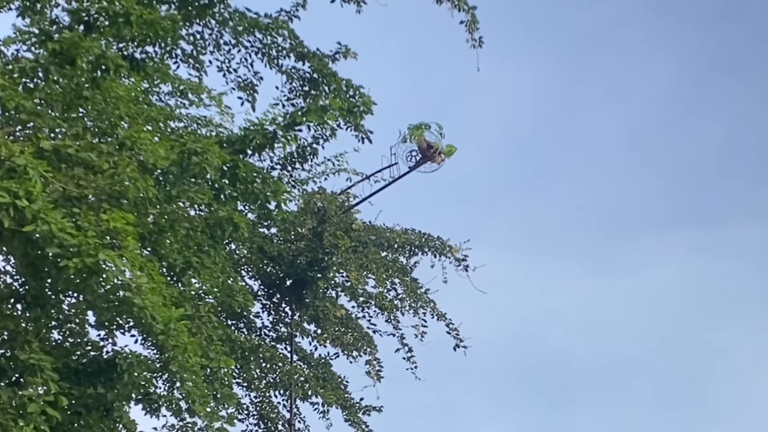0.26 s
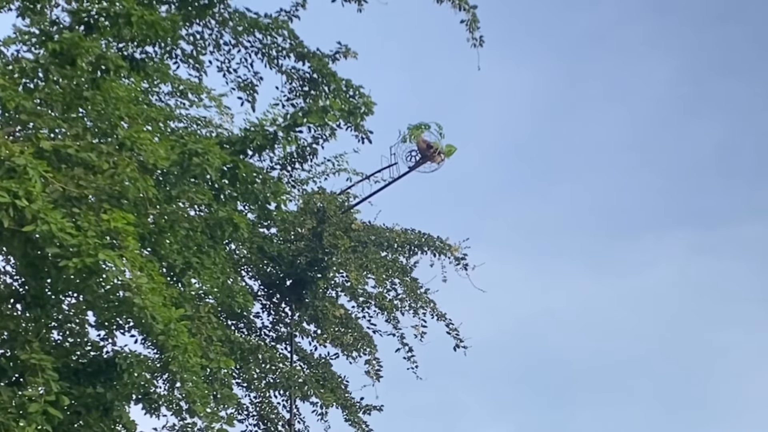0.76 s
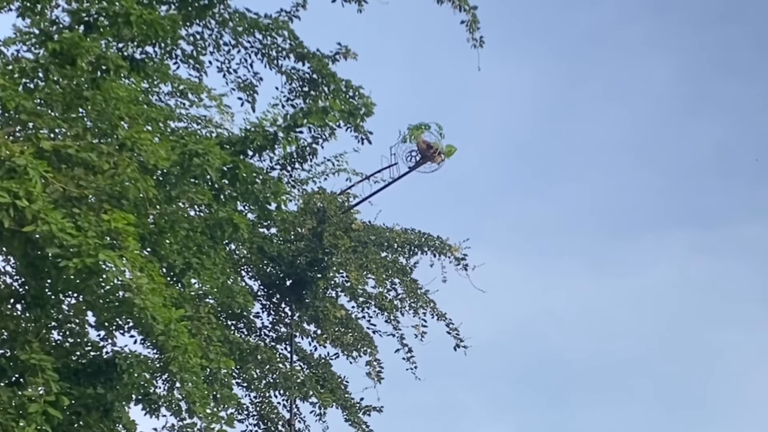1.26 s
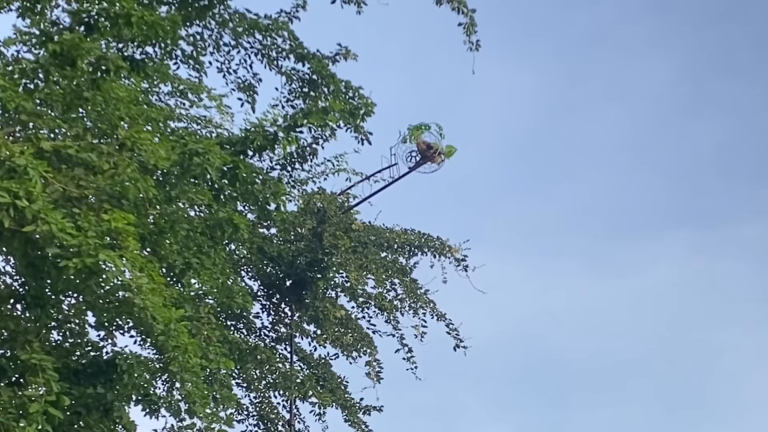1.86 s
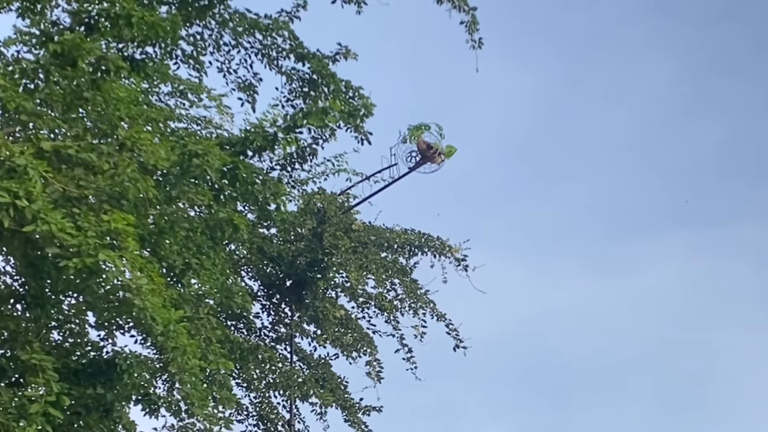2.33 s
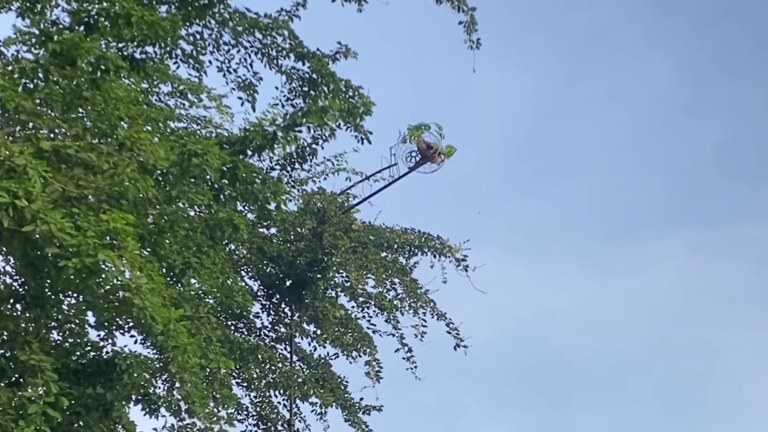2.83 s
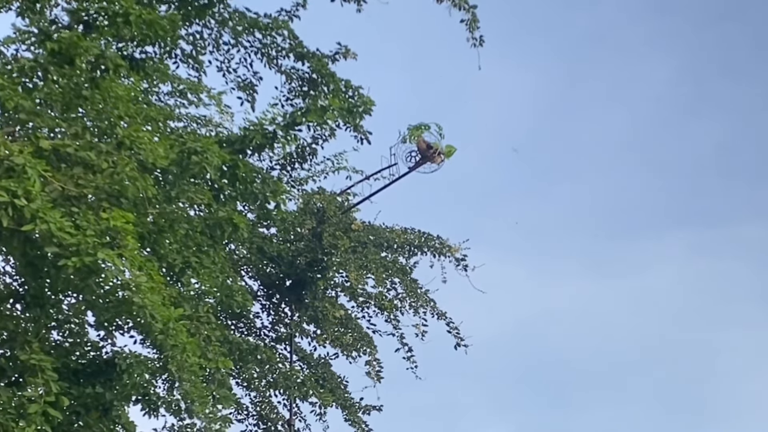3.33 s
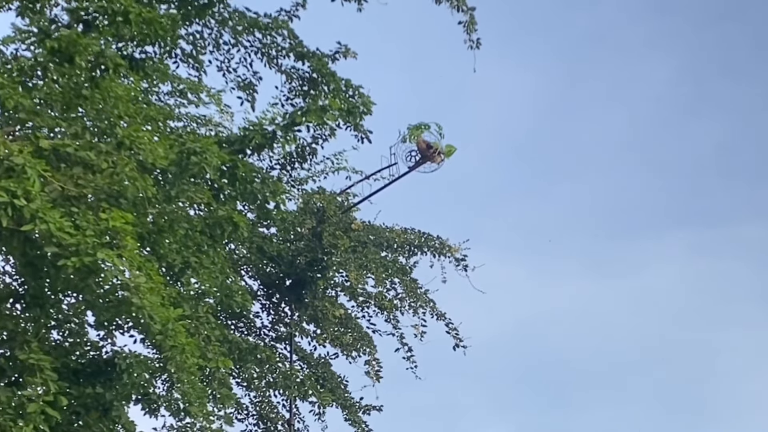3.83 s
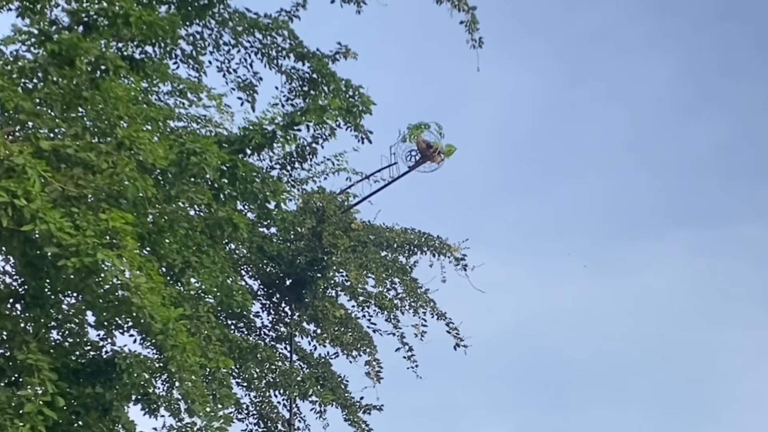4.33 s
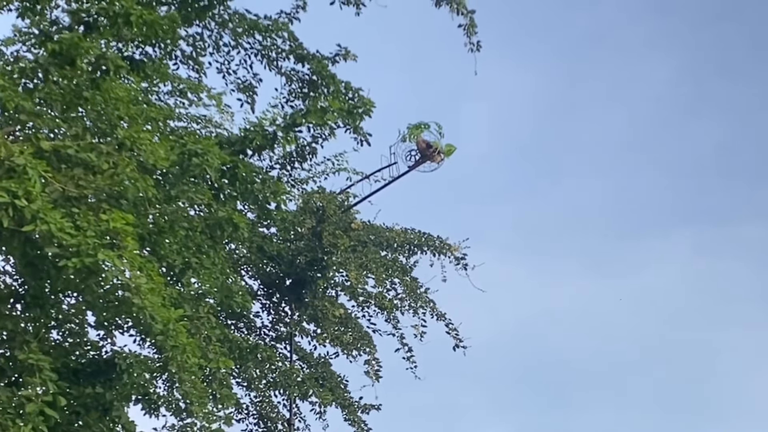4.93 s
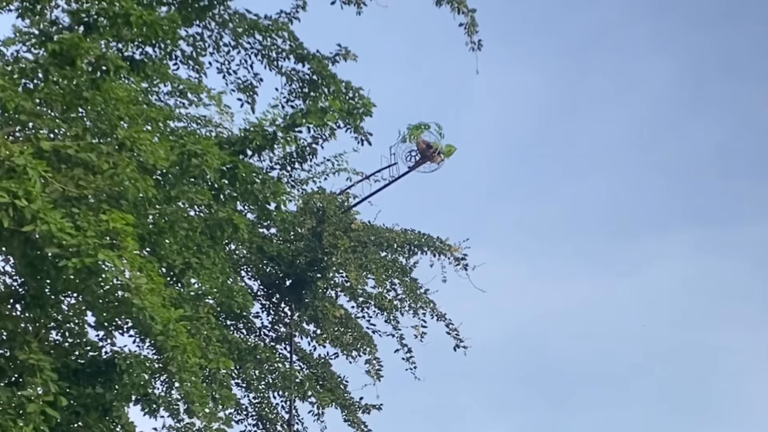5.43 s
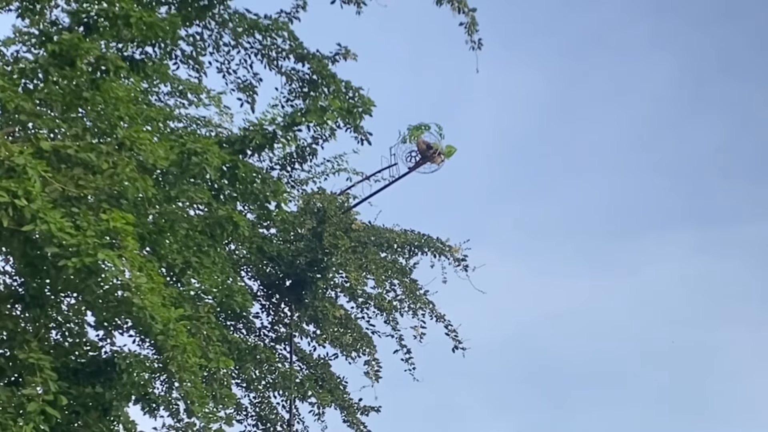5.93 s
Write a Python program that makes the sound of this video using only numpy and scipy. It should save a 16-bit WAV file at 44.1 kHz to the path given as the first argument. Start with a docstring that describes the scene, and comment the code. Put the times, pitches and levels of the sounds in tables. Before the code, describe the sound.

A low dove gives two four-note cooing phrases, each answered by a higher dove from the side, amid steady insect trills and distant rumble.

```python
"""A garden where two doves coo in turn from cages hung on poles: a near one in two low four-note phrases
with a rolled third note, a higher one answering twice from one side. Each coo is a nearly pure gliding
tone coloured by its path, with echoes from walls and trees. Faint high tones are small arched notes,
insects trills of falling whistles; small birds, distant traffic and open air are filtered noise, and
one engine is a drifting sine."""
import sys
import numpy as np
from scipy import signal
from scipy.fft import rfft, irfft, next_fast_len
from scipy.io import wavfile
from scipy.ndimage import uniform_filter1d, map_coordinates

SR = 44100
rng = np.random.default_rng(int(sys.argv[2]) if len(sys.argv) > 2 else 0)


def bounce(signal):
    """Save signal as a 16-bit WAV file at the path given by the first command-line argument."""
    frames = np.transpose(np.atleast_2d(signal))
    limited = np.clip(frames, -1, 1)
    pcm = np.round(limited * 32767).astype(np.int16)
    wavfile.write(sys.argv[1], SR, pcm)


N = 272979  # length in samples

# Level of the traffic rumble. Each row: time in seconds, level in dB.
TRAFFIC = [(0.0, -23), (0.14, -31), (0.58, -25.5), (1.21, -31), (1.26, -27), (2.481, -28.5), (2.53, -24.5),
           (2.57, -29.5), (4.57, -28), (5.57, -30.5), (5.77, -29), (6.19, -29)]
# Spectrum of the rumble. Each row: frequency in Hz, relative density in dB per Hz.
RUMBLE = [(12, -39), (20, -26), (43, 3.5), (65, 2), (112, -3.5), (160, -5.5), (219, -12), (420, -20),
          (550, -49), (920, -120)]
# Spectrum of the open air. Each row: frequency in Hz, relative density in dB per Hz.
AIR = [(150, -19), (300, -1), (450, -2.5), (700, -5.5), (1000, -9), (1300, -12.5), (1700, -22.5),
       (2400, -28.5), (3300, -34.5), (5400, -38), (5850, -31), (6350, -35), (6600, -38.5), (8300, -47.5),
       (12000, -47)]
# Likeness of left and right in the noise layers. Each row: frequency in Hz, correlation 0-1.
LEFT_RIGHT_LIKENESS = [(50, 1), (120, 0.98), (250, 0.91), (500, 0.8), (800, 0.15), (1300, 0), (2200, 0.086),
                       (3000, 1), (3800, 0.99), (6300, 1), (8000, 0.1)]

# Level of the farther insects, before a small final lift. Each row: time in seconds, level in dB.
CHORUS = [(0, -55), (.45, -58), (.8, -58.5), (1.151, -62.5), (1.45, -61.5), (1.802, -56.5), (2.2, -52),
          (2.3, -67), (2.33, -65), (2.38, -56), (2.9, -53), (3.7, -56), (4.12, -56.5), (4.4, -53.5),
          (4.82, -57), (5.25, -56.5), (5.45, -52), (6.19, -54.5)]
# Resonance of their blurred rasp. Each row: frequency in Hz, gain in dB.
RASP = [(2180, -44.5), (3700, -13), (3970, -9), (4310, 0), (4530, 4), (5000, -4.5), (5210, -21.5),
        (5320, -18), (5600, -21), (7280, -48.5), (12300, -120)]
# Chirps of the nearer insects, each an even run of wing strokes. Each row: first stroke in seconds,
# last stroke in seconds, level in dB before colour, echoes and trim, middle pitch in Hz.
CHIRPS = [(.032, .199, -46, 4686), (0.272, .431, -47, 4730), (0.555, 0.67, -48.5, 4630),
          (0.821, 0.905, -48.5, 4500), (0.964, 1.043, -50, 4540), (1.238, 1.354, -52.5, 4515),
          (1.484, 1.598, -51, 4515), (1.63, 1.754, -47, 4795), (1.832, 1.913, -47, 4950),
          (1.926, 2.038, -49, 4570), (2.072, 2.246, -46, 4725), (2.356, 2.498, -47.5, 4660),
          (2.559, 2.706, -50.5, 4590), (2.662, 2.782, -49, 4940), (2.79, 2.871, -52.5, 4620),
          (2.9, 3.058, -47, 4750), (3.127, 3.264, -46.5, 4735), (3.316, 3.417, -50.5, 4410),
          (3.378, 3.51, -47.5, 4890), (3.549, 3.663, -50, 4560), (3.736, 3.896, -51, 4580),
          (3.981, 4.09, -47, 4550), (4.214, 4.288, -48, 4540), (4.367, 4.522, -49.5, 4635),
          (4.64, 4.763, -49, 4610), (4.905, 4.991, -46.5, 4690), (5.103, 5.215, -49.5, 4630),
          (5.381, 5.492, -53.5, 4550), (5.5, 5.571, -48.5, 4905), (5.648, 5.747, -48.5, 4565),
          (5.808, 5.892, -47.5, 4580), (5.903, 5.983, -48, 4730), (6.043, 6.156, -48.5, 4570)]
# Colour of a single wing stroke. Each row: frequency in Hz, gain in dB.
STROKE_COLOUR = [(3900, -9.5), (4150, 0), (4300, 0.5), (4440, 3), (4580, 1), (4740, 0), (4840, -1),
                 (5030, 1.5), (5250, -11)]
STROKE_PERIOD_S, STROKE_S, STROKE_FALL_HZ_PER_S = .0393, .029, 34000
CHIRP_SWELL_DB, CHIRP_SAG_HZ = 1.5, 115  # a chirp is loudest in its middle and sinks in pitch as it goes

# The near dove, two phrases of four notes. Each row: start in seconds, rise in seconds, hold in seconds,
# fall in seconds, top pitch in Hz, pitch after the hold in Hz, last pitch in Hz, lateness of the sag
# (an exponent), level in dB before the colour and the push.
LOW_COOS = [ (.629, .06, 0.014, 0.0037, 745, 739, 700, 0.82, -18),
            (.927, 0.027, 0.17, .027, 668.7, 627, 537, 5, -18),
            (1.316, .034, 0.35, 0.095, 664.7, 568.8, 349, 1.5, -16.5),
            (2.032, .039, .138, .02, 622, 585, 504, 4.2, -17),
            (3.674, 0.044, 0.021, .006, 725, 741, 700, 1, -17),
            (3.965, .027, .177, 0.024, 669.8, 620.6, 530, 4, -18.5),
            (4.349, .036, 0.33, .115, 661.5, 566.5, 353.4, 1.6, -17),
            (5.065, .038, 0.14, .026, 623, 587.7, 514, 3.8, -16.5)]
# The higher dove, two answers of four notes, with the same columns.
HIGH_COOS = [ (2.851, .052, .103, .018, 1188, 1124, 1010, 1.8, -22),
             (3.02, .035, 0.0033, .012, 1074, 1052, 963, 1.2, -22),
             (3.099, .034, .002, .008, 973, 978, 944, 1, -23),
             (3.204, .027, .045, .022, 1091, 1062, 982, 1.7, -23.5),
             (5.356, .05, 0.096, .021, 1184, 1122, 974, 2, -22.5),
             (5.535, .034, 0.0025, 0.011, 1073, 1035, 957, 1, -22),
             (5.617, .032, .003, 0.011, 1060, 1042, 970, 1.2, -22.5),
             (5.727, .028, .05, 0.017, 1114, 1065, 1020, 2, -23)]
# Colour of each dove's direct sound: reflections near the microphone strengthen some pitches and
# weaken others. Each row: pitch in Hz, gain in dB.
LOW_PATH = [(320, -19), (420, -21), (470, -13.5), (515, -8), (565, -1.1), (590, -2), (615, -7), (638, -18),
            (665, -9.5), (715, -22.5), (765, -23.5)]
HIGH_PATH = [(780, -19.5), (890, -14), (950, 1.5), (1020, -3.5), (1090, -10.5), (1190, -10)]
# The more even colour each bird spreads to the walls and trees. Each row: pitch in Hz, gain in dB.
LOW_SPREAD = [(400, -22.5), (520, -9), (570, 1), (615, -3.5), (670, -8), (760, -12)]
HIGH_SPREAD = [(850, -20.5), (950, 1.5), (1080, -3), (1200, -8.5)]
# A rising note lingers briefly near one pitch, then climbs on.
# Each row: share of the rise, pitch as a ratio to the lingering pitch.
LINGER = [(.37, 0.9803), (.63, 1.025)]
DROP_CURVE = 1.2  # as the air runs out the pitch slides down, ever faster
PUSH_DB, RELEASE_DB_PER_S = 2, 70  # a note grows louder toward its end, then fades as the pitch drops
# The rattle near the opening of each long note, faltering once. Each row: first beat in seconds,
# length in seconds, level in dB, weak beat in seconds, change of the weak beat in dB.
ROLLS = [(1.349, 0.13, -18.5, 1.432, -2), (4.3833, .086, -19.5, 4.404, -6.5)]
ROLL_PERIOD_S, ROLL_HZ = .0203, 595.5

# Decay of the diffuse scatter. Each row: frequency in Hz, time to fall 60 dB in seconds.
GARDEN_DECAY = [(300, 0.95), (1000, 1), (5000, .25), (10000, 0.14)]
# Wall echoes of each dove. Each row: delay in seconds, left gain in dB, right gain in dB.
LOW_ECHOES = [(.045, -18, -15.5), (.078, -30, -28)]
HIGH_ECHOES = [(.05, -28, -15), (.082, -27, -17.5), (.135, -30, -28)]
# A reflection colours the higher dove at the right microphone.
# Each row: frequency in Hz, gain in dB, phase lead in radians.
RIGHT_PATH = [(800, -10, 0.93), (986, -16.5, 2.2), (1018, -3, 3.9), (1083, 0.5, 1.76), (1190, 0.5, 3.03)]

# Faint high tones: far doves, and at 4.64 s the octave of the near dove's long note.
# Each row: start in seconds, length in seconds, pitch in Hz, depth of the pitch arch 0-1,
# level in dB before the direct and scattered shares.
FAINT_TONES = [(0.799, 0.22, 756, 0.09, -42), (1.053, 0.19, 748, 0, -39), (1.257, 0.12, 747, 0.01, -39.5),
               (2.482, 0.12, 926, .1, -42.5), (4.32, .15, 1217, .07, -45.5),
               (4.443, .09, 1148, 0.05, -45.5), (4.64, 0.1, 1144, 0.2, -43), (5.85, 0.094, 830, 0, -44.5)]
# Small birds far off. Each row: middle in seconds, length in seconds, level in dB before the final trim.
TWITTER = [(1.07, 0.18, -60), (2.146, 0.072, -57.5), (3.116, .2, -59), (3.398, .22, -60.5),
           (3.736, .25, -59), (4.669, 0.26, -59), (5.394, .23, -59.5)]
# Spectrum of their twitter. Each row: frequency in Hz, gain in dB.
TWITTER_BAND = [(2200, -22.5), (2800, -4.5), (3200, 2.5), (3600, -1.5), (4000, 0.5), (4600, -31.5)]
TWITTER_FLOOR_DB = -65  # before the same trim
LOW_CUT_HZ, TOP_HZ = 45, 12400


def amp(db):
    """Logarithmic level: decibels become a factor of amplitude."""
    return 10 ** (np.asarray(db) / 20)


def unit(x):
    """Normalisation of power: the signal is scaled to rms 1."""
    return x / np.sqrt(np.mean(x ** 2) + 1e-20)


def along(points, hz):
    """Interpolation along a logarithmic frequency axis."""
    f, v = np.transpose(points)
    return np.interp(np.log(hz + 1), np.log(f + 1), v)


def wobble(rate):
    """Slow random modulation: a smooth curve through random knots, rate of them a second."""
    knots = rng.standard_normal(int(N * rate / SR) + 4)
    return map_coordinates(knots, [np.arange(N) * rate / SR])


def filtered(x, response):
    """Linear filtering: the spectrum is multiplied by a complex response of frequency."""
    m = next_fast_len(N + SR // 2)
    return irfft(rfft(x, m) * response(np.fft.rfftfreq(m, 1 / SR)), m)[..., :N]


def delayed(x, delay_s):
    """Propagation delay: the wave arrives delay_s later."""
    return np.pad(x, (int(delay_s * SR), 0))[:N]


def add(track, s, sound):
    """Superposition: a sound is summed into a track from time s on."""
    start = int(np.clip(round(s * SR), 0, N))
    track[start:start + len(sound)] += sound[:N - start]


def rush(spectrum, patchy_db):
    """Partly coherent noise: a stereo pair of rms 1 with patches of random gain in time and frequency."""
    z = signal.stft(rng.standard_normal((2, N)), nperseg=512)[2]
    field = uniform_filter1d(rng.standard_normal(z.shape[1:]), size=8, axis=0)
    field = uniform_filter1d(field, size=18, axis=1)
    pair = signal.istft(z * amp(patchy_db * unit(field)), nperseg=512)[1][:, :N]

    def mid_side(hz):
        # the angle between mid and side sets the correlation of the ears
        turn = np.arccos(np.clip(along(LEFT_RIGHT_LIKENESS, hz), -1, 1)) / 2
        return amp(along(spectrum, hz)) * [np.cos(turn), np.sin(turn)]

    mid, side = filtered(pair, mid_side)
    return unit(np.array([mid + side, mid - side]))


def background():
    """Broadband noise and a drifting sine: far traffic and one engine's drone under the hush of open air."""
    level_db = np.interp(np.arange(N) / SR, *np.transpose(TRAFFIC))
    rumble = amp(level_db + 0.31 * wobble(10)) * rush(RUMBLE, patchy_db=0.5)
    drone_hz = 113 * (1 + .015 * wobble(5))
    drone = amp(-37 + 2.9 * wobble(4.4)) * np.sin(2 * np.pi * np.cumsum(drone_hz) / SR)
    air = amp(-40.5 + 1.4 * wobble(0.52)) * rush(AIR, patchy_db=1.92)
    return rumble + drone + air


def stroke(hz, db):
    """Frequency sweep: one wing stroke is a short whistle falling fast through its middle pitch."""
    u = np.linspace(-.5, .5, int(STROKE_S * SR))
    sweep = hz - STROKE_FALL_HZ_PER_S * STROKE_S * u
    return np.sqrt(2) * amp(db) * np.cos(np.pi * u) * np.sin(2 * np.pi * np.cumsum(sweep) / SR)


def foliage(x, t60):
    """Multiple scattering: nearby leaves smear the sound with decaying noise, at the same power."""
    t = np.arange(SR // 8) / SR
    leaves = rng.standard_normal(len(t)) * amp(-60 * t / t60)
    return unit(signal.fftconvolve(x, leaves)[:N]) * np.std(x)


def chorus(rate=25.5, hz=4740):
    """Superposed stridulation: farther insects stroke on and on, rate a second, blurred into a soft rasp."""
    track = np.zeros(N)
    strokes_so_far = np.cumsum(rate * (1 + .04 * wobble(5))) / SR
    for at in np.flatnonzero(np.diff(np.floor(strokes_so_far))):
        add(track, at / SR, stroke(hz, 0))
    blur = unit(filtered(rng.standard_normal(N), lambda f: amp(along(RASP, f))))
    rasp = unit(unit(foliage(track, t60=.11)) + amp(3) * blur)
    level_db = np.interp(np.arange(N) / SR, *np.transpose(CHORUS))
    return amp(level_db + 1.04) * rasp


def insects():
    """Stridulation with early reflections: insects chirp; two walls begin each repeat before the next stroke."""
    track = np.zeros(N)
    for first, last, db, hz in CHIRPS:
        times = np.linspace(first, last, round((last - first) / STROKE_PERIOD_S) + 1)
        for s, u in zip(times, np.linspace(-1, 1, len(times))):
            sharp, strong_db = rng.standard_normal(2) * [.011, 1.1]
            stroke_hz = hz * (1 + sharp) - CHIRP_SAG_HZ * u / 2
            stroke_db = db + strong_db - CHIRP_SWELL_DB * u ** 2
            add(track, s - STROKE_S / 2, stroke(stroke_hz, stroke_db))
    track = filtered(track, lambda f: amp(along(STROKE_COLOUR, f)))
    first_wall = amp(-5.0) * delayed(track, .021)
    second_wall = amp(-5.5) * delayed(track, .029)
    smear = amp(-.5) * foliage(track, t60=.085)
    return amp(-3.5) * (track + first_wall + second_wall + smear)


def tone(hz, size, second_db):
    """Harmonic oscillation: a nearly pure tone with a trace of its octave."""
    phase = 2 * np.pi * np.cumsum(hz) / SR
    return np.sqrt(2) * size * (np.sin(phase) + amp(second_db) * np.sin(2 * phase))


def coo(notes, colours, rest_hz, linger_hz, edge_s, waver, flutter_db):
    """Path coloration: a gliding note rises from rest_hz, sags and slides away, one track per colour."""
    voices = np.zeros((len(colours), N))
    drift, flutter = 1 + waver * wobble(90), flutter_db * wobble(70)
    share, ratio = np.transpose(LINGER)
    for s, rise, hold, fall, top_hz, late_hz, last_hz, lateness, db in notes:
        t = np.arange(int((rise + hold + fall) * SR)) / SR
        at = int(s * SR) + np.arange(len(t))
        scoop = np.interp(t / rise, [0, *share, 1], [rest_hz, *(linger_hz * ratio), top_hz])
        sag = np.clip((t - rise) / hold, 0, 1) ** lateness
        drop = np.clip((t - rise - hold) / max(fall, 1 / SR), 0, 1)
        hz = scoop + (late_hz - top_hz) * sag + (last_hz - late_hz) * drop ** DROP_CURVE
        effort_db = db + PUSH_DB * sag - RELEASE_DB_PER_S * fall * drop + flutter[at]
        edges = np.minimum(1, np.minimum(t, t[-1] - t) / edge_s)
        for voice, colour in zip(voices, colours):
            size = uniform_filter1d(amp(effort_db + along(colour, hz)), size=150) * edges
            add(voice, s, tone(hz * drift[at], size, second_db=-45.5))
    return voices


def roll(beat_s=0.01377, sweep=0.15, choke_db=-11, rebound_s=.0085, rebound_db=-9):
    """Pulsed flow: the throat lets out rising gushes with weak rebounds; also gives the choked note's gain."""
    beats, choke = np.zeros(N), np.zeros(N)
    u = np.linspace(-.5, .5, int(beat_s * SR))
    for first, length, db, falter_s, falter_db in ROLLS:
        for s in np.arange(first, first + length, ROLL_PERIOD_S):
            late_s, sharp, strong_db, slack_s = rng.standard_normal(4) * [.0007, .035, .8, .0007]
            falters = abs(s - falter_s) < ROLL_PERIOD_S / 2
            size = amp(db + strong_db + falter_db * falters) * np.hanning(len(u))
            gush = tone(ROLL_HZ * (1 + sharp + sweep * u), size, second_db=-43.5)
            start = s + late_s - beat_s / 2
            add(beats, start, gush)
            add(beats, start + rebound_s + slack_s, amp(rebound_db) * gush)
        choke_s = length + ROLL_PERIOD_S / 2
        add(choke, first - ROLL_PERIOD_S / 2, signal.windows.tukey(int(choke_s * SR), .15))
    return beats, amp(choke_db * choke)


def placed(x, lead_ms):
    """Interaural time difference: the direct sound reaches the left microphone lead_ms earlier."""
    lag_s = np.array([[-.5], [.5]]) * lead_ms / 1000
    return filtered(x, lambda hz: np.exp(-2j * np.pi * hz * lag_s))


def echoes(x, walls):
    """Specular reflection: house walls return single delayed copies."""
    return sum(amp([[left], [right]]) * delayed(x, s) for s, left, right in walls)


def garden(x):
    """Diffuse reflection: scatter from leaves and walls, different at each ear, at the power of x."""
    hz, t, z = signal.stft(rng.standard_normal((2, SR)), SR, nperseg=256)
    decay = amp(-60 * t / along(GARDEN_DECAY, hz)[:, None])
    tail = signal.istft(z * decay, SR, nperseg=256)[1]
    wet = signal.fftconvolve(x[None], tail, axes=1)[:, :N]
    return unit(wet) * np.std(x)


def treeline(x, delay_s, depth_s):
    """Distributed reflection: a late echo from a row of trees, blurred by their depth."""
    count = int(depth_s * SR)
    leaves = rng.standard_normal((2, count)) * np.hanning(count)
    wet = signal.fftconvolve(delayed(x, delay_s)[None], leaves, axes=1)[:, :N]
    return unit(wet) * np.std(x)


def low_dove():
    """Direct and reflected sound: the near bird, almost straight ahead, with its rolled notes."""
    voice, spread = coo(LOW_COOS, [LOW_PATH, LOW_SPREAD], rest_hz=480, linger_hz=565.0,
                        edge_s=0.0021, waver=0.0034, flutter_db=0.5)
    beats, choke = roll()
    direct = amp([[.15], [-.15]]) * placed(choke * voice + beats, lead_ms=0.046)
    scatter = amp(-17.0) * garden(spread + beats)
    trees = amp(-21.5) * treeline(spread, delay_s=0.19, depth_s=.14)
    return direct + echoes(spread, LOW_ECHOES) + scatter + trees


def faint_tones(waver=0.0056):
    """Direct and diffuse sound: each faint high tone arches in pitch and level, much of it scattered."""
    voice = np.zeros(N)
    for s, length, hz, arch, db in FAINT_TONES:
        u = np.linspace(-1, 1, int(length * SR))
        pitch_hz = hz * (1 - arch * u ** 2 + waver * wobble(60)[:len(u)])
        add(voice, s, tone(pitch_hz, amp(db) * np.sqrt(1 - u ** 2), second_db=-44.0))
    return amp(-3.0) * voice + amp(-8.5) * garden(voice)


def twitter():
    """Band-limited noise: distant small birds, blurred by the trees into soft patches."""
    size = np.full(N, amp(TWITTER_FLOOR_DB))
    for s, length, db in TWITTER:
        add(size, s - length / 2, amp(db) * np.hanning(int(length * SR)))
    return amp(-5.0) * size * rush(TWITTER_BAND, patchy_db=3)


def high_dove():
    """Interference at one ear: the answering bird, off to one side and richer in echoes."""
    voice, spread = coo(HIGH_COOS, [HIGH_PATH, HIGH_SPREAD], rest_hz=774, linger_hz=968.3,
                        edge_s=0.0075, waver=0.0088, flutter_db=0.95)
    f, db, lead = np.transpose(RIGHT_PATH)
    right = filtered(voice, lambda hz: amp(np.interp(hz, f, db)) * np.exp(1j * np.interp(hz, f, lead)))
    scatter = amp(-13.5) * garden(spread)
    return np.array([voice, right]) + echoes(spread, HIGH_ECHOES) + scatter


def scene():
    """Superposition of all sources: doves, faint tones, insects, small birds and the town behind them."""
    return background() + chorus() + insects() + low_dove() + faint_tones() + twitter() + high_dove()


def record(dry):
    """Band limiting: the phone drops the deepest bass and keeps nothing above its upper limit."""
    return filtered(dry, lambda hz: (hz < TOP_HZ) * hz ** 4 / np.sqrt(hz ** 8 + LOW_CUT_HZ ** 8))


dry = scene()
out = record(dry)
bounce(out)
```